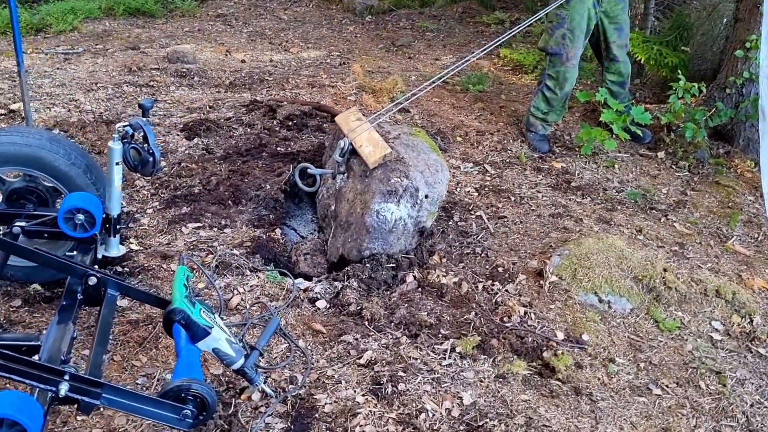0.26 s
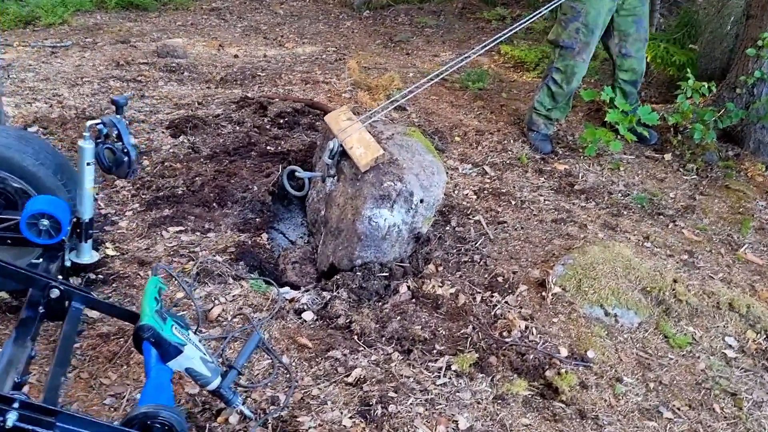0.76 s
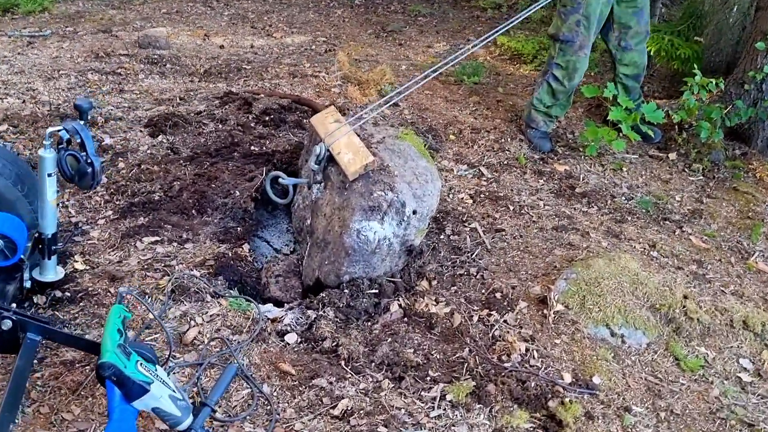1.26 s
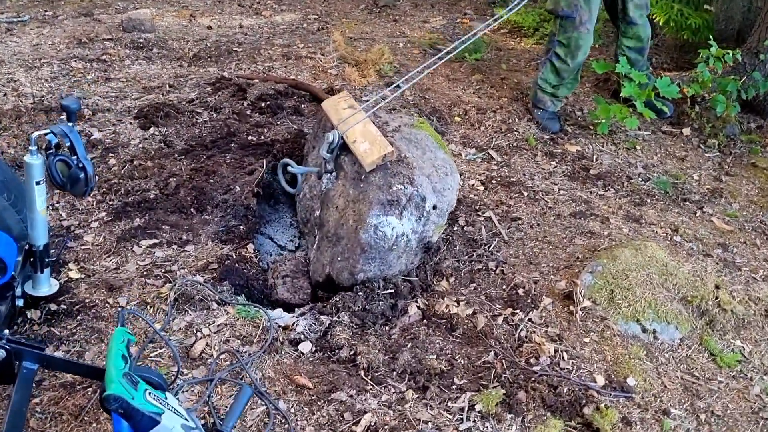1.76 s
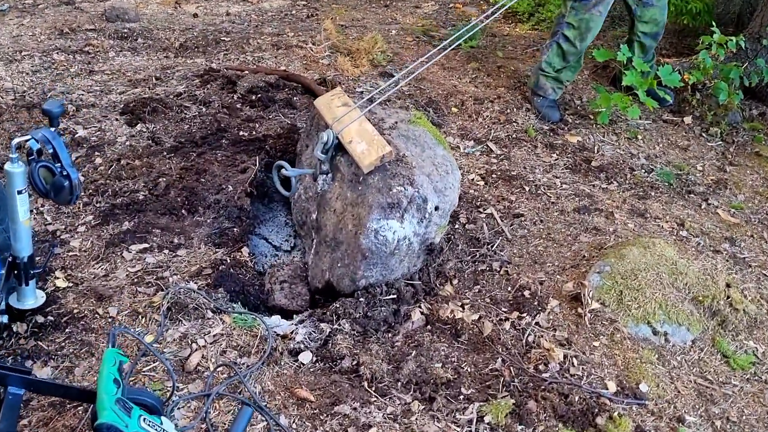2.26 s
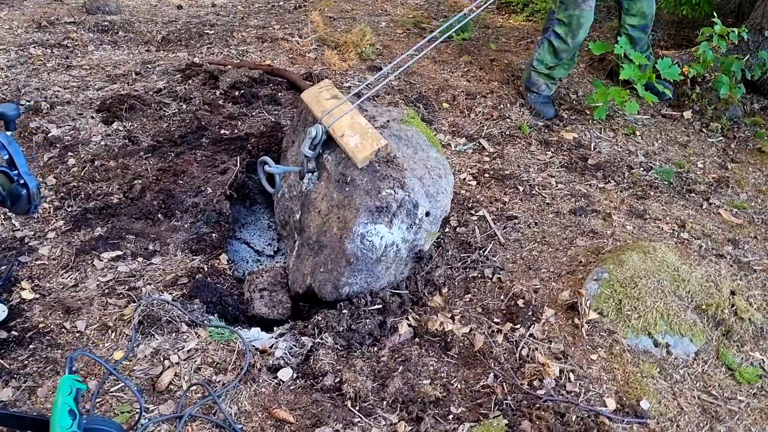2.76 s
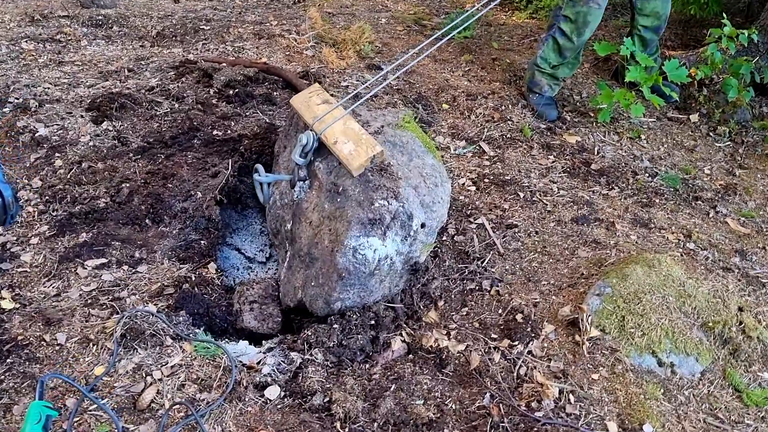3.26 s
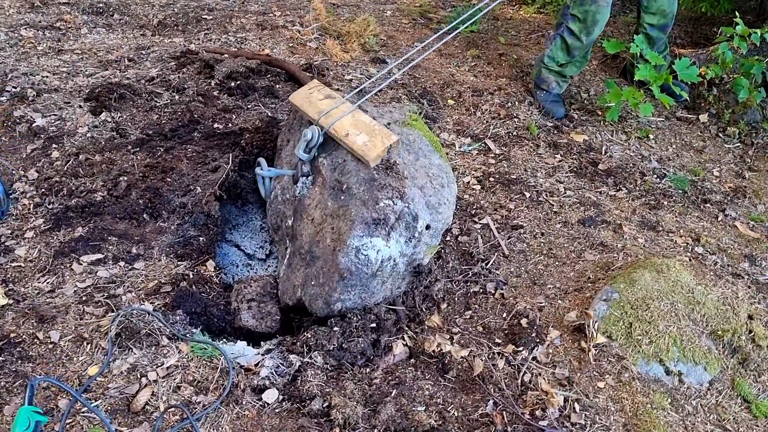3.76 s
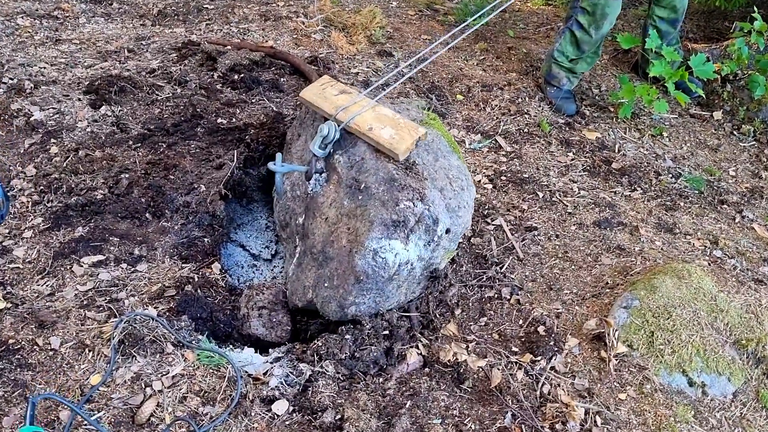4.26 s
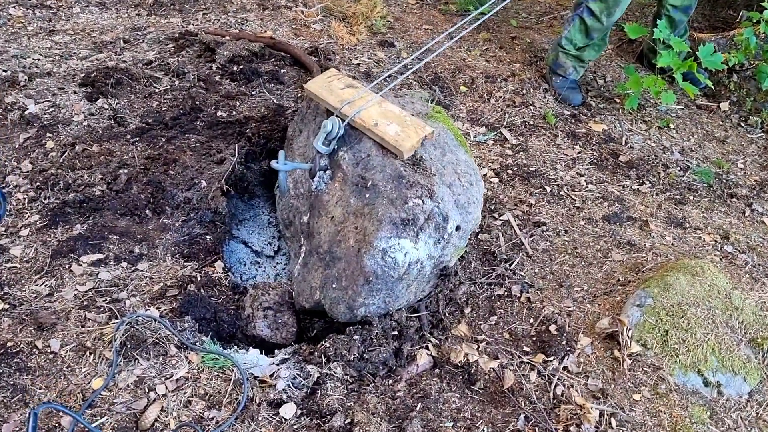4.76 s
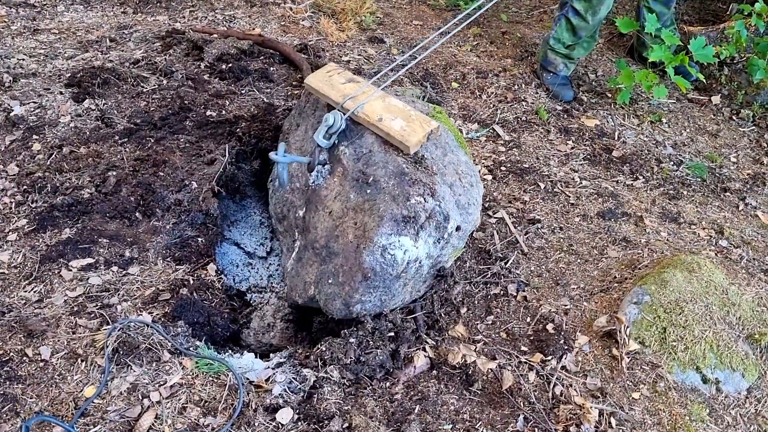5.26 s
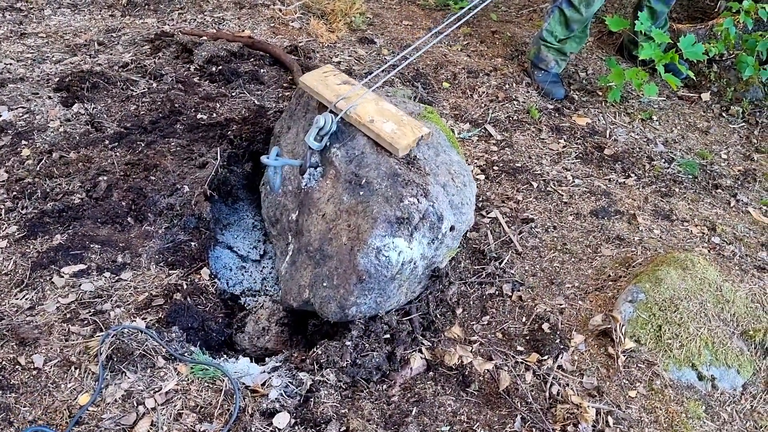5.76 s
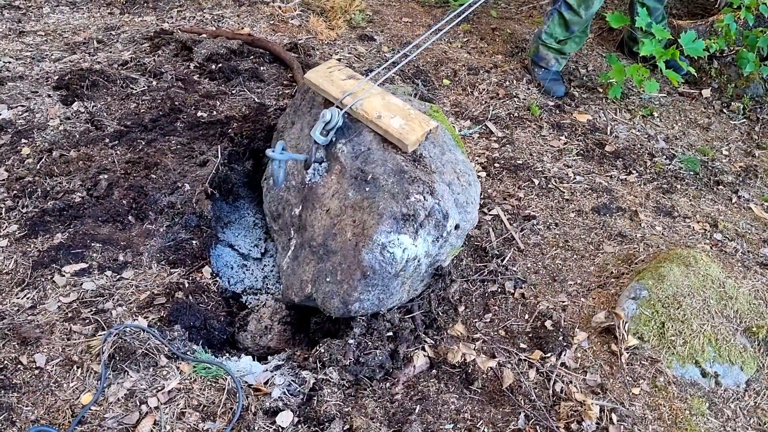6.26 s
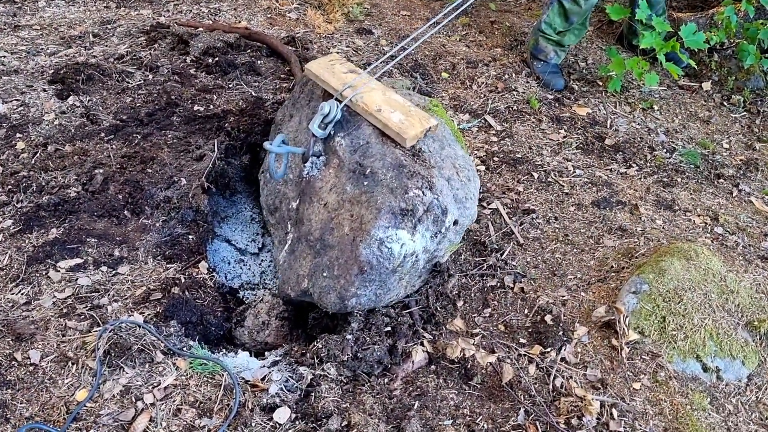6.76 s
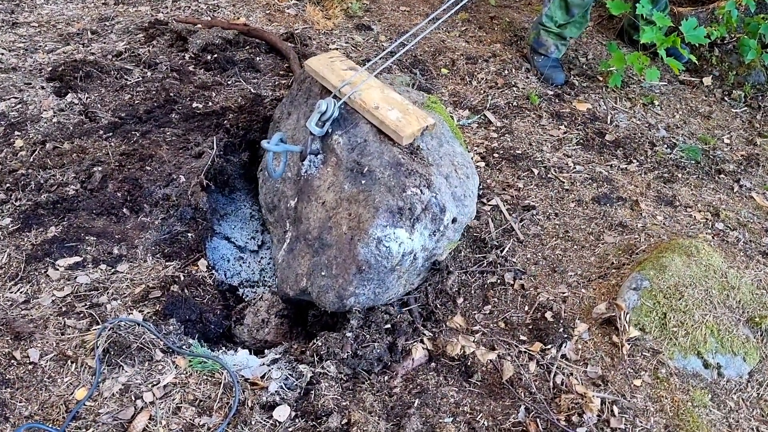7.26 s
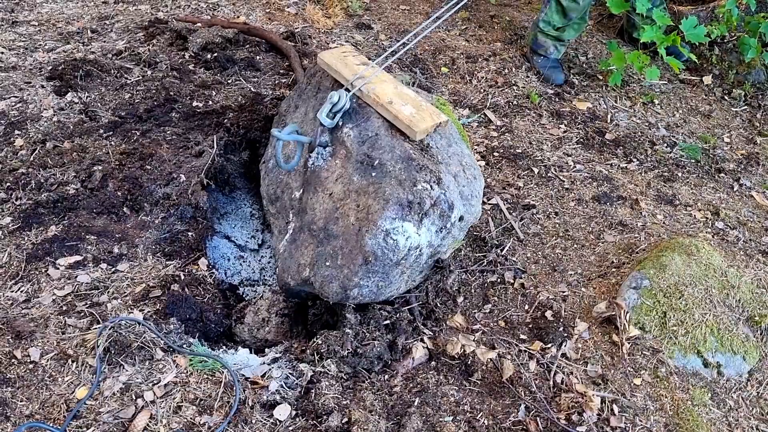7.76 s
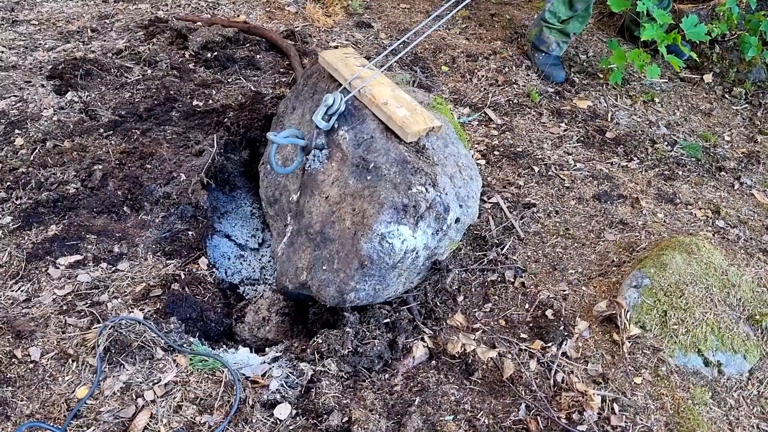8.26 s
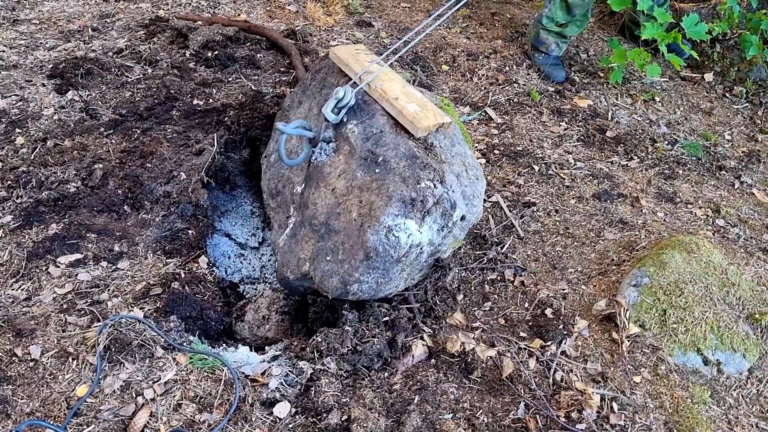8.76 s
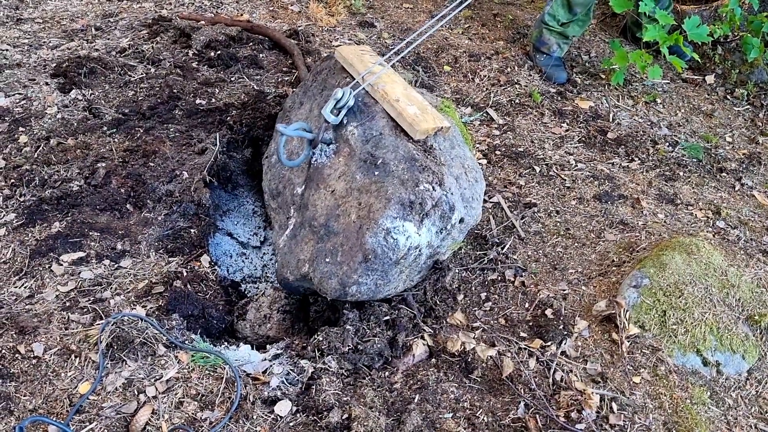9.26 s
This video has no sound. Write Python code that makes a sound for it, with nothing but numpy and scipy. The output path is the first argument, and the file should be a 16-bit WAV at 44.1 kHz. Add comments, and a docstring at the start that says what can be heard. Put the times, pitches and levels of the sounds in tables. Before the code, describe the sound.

A hand cable winch, slightly to the right, ratchets steadily in sharp groups of three clicks, its steel frame knocking and rattling between strokes. In front, a boulder groans briefly and thuds in the soil while twigs crack. The taut cable squeaks once near the middle, followed by the heaviest thud; later a steel hook rings briefly. Faint birds whistle far off over a soft forest hiss, heard in stereo.

```python
"""Sharp ratchet clicks in threes, off to the right: a hand cable winch drags a boulder out of its hole.
Each push and pull of the lever lets one of two steel pawls snap over three teeth; between strokes the
frame knocks under load and the cable squeaks once. In front of the microphone pair the boulder groans
and thuds in the soil and twigs crack. Far birds whistle over the hiss of the forest all round."""
import sys
import numpy as np
from scipy import signal
from scipy.fft import rfft, irfft
from scipy.io import wavfile
from scipy.ndimage import uniform_filter1d

SR = 44100
rng = np.random.default_rng(int(sys.argv[2]) if len(sys.argv) > 2 else 0)


def log_audio(samples):
    """Write samples as a 16-bit WAV file to the path given in sys.argv[1]."""
    # one column per channel
    frames = np.atleast_2d(samples).T
    # limit to full scale, then quantise
    limited = np.clip(frames, -1, 1)
    pcm = np.round(limited * 32767).astype(np.int16)
    wavfile.write(sys.argv[1], SR, pcm)


N = 418943

# Lever strokes. Each row: three snap times in seconds, then ring and clack in relative dB.
PUSH_STROKES = [(0.8839, 0.9541, 1.033, -13.5, -25.5), (2.092, 2.1622, 2.2318, -12.5, -24),
                (3.2596, 3.3362, 3.4092, -11.5, -24), (4.5175, 4.59, 4.6788, -14, -24.5),
                (5.718, 5.7888, 5.8866, -15.5, -26), (6.9505, 7.018, 7.103, -15, -25),
                (8.128, 8.206, 8.2803, -14, -25.5), (9.341, 9.4238, 9.505, -16, -25)]
PULL_STROKES = [(0.0686, 0.15, 0.2335, -11.5, -30.5), (1.3865, 1.475, 1.5526, -12, -30.5),
                (2.591, 2.675, 2.7387, -13, -29.5), (3.784, 3.8678, 3.937, -14, -29),
                (4.9701, 5.0468, 5.12, -15.5, -31), (6.1582, 6.2382, 6.315, -15.5, -30.5),
                (7.441, 7.5194, 7.5936, -16, -29.5), (8.632, 8.708, 8.771, -14.5, -29.5)]
# The pull pawl bounces on a tooth. Each row: start in seconds, ring and clack in relative dB.
PAWL_BOUNCES = [(3.8905, -23, -34.5), (5.2011, -29, -41)]
# Resonances of pawls, housing and frame. Each row: pitch in Hz, nominal width in Hz, gain in dB.
PUSH_PAWL_MODES = [(13530, 1130, -1.5), (15500, 810, -27)]
PULL_PAWL_MODES = [(11820, 200, -22.5), (12540, 740, -4.5), (14900, 890, -27)]
PUSH_HOUSING_MODES = [(1690, 230, -9.5), (2280, 230, -13), (2780, 56, -6.5), (3480, 170, -11),
                      (4166, 103, -2.5), (5190, 340, -3.5), (5660, 140, -8.5), (6050, 140, -17),
                      (6600, 120, -1)]
PULL_HOUSING_MODES = [(1570, 480, -6.5), (2290, 150, -7), (2655, 62, -3.5), (3040, 62, -4),
                      (3930, 30, -8.5), (5330, 53, -2.5), (5600, 35, -15), (7000, 470, -1)]
FRAME_RESONANCES = [(544, 52, -14.5), (1552, 81, -7.5), (1842, 72, -8), (2213, 45, -12.5), (2890, 35, -10),
                    (3380, 63, -9)]
# Knocks of the frame. Each row: start in seconds, body and rattle in relative dB.
FRAME_KNOCKS = [(0.805, -32, -45.5), (1.268, -26.5, -33), (2.005, -35, -46), (2.466, -32, -37),
                (2.619, -43, -49), (3.154, -32, -43), (3.488, -42, -46), (3.665, -31.5, -33),
                (3.893, -42, -37), (3.936, -36, -47), (3.966, -34.5, -45), (4.427, -33, -38.5),
                (4.834, -37, -42), (5.09, -36.5, -58), (5.106, -30.5, -51), (5.502, -42, -52.5),
                (5.627, -38, -49), (6.033, -34, -39), (6.236, -26.5, -37), (6.3, -36, -42),
                (6.464, -43, -41.5), (6.768, -43, -50), (6.867, -27, -32.5), (7.293, -29, -33),
                (7.548, -33.5, -59), (7.595, -29.5, -38), (7.605, -24.5, -37), (7.681, -32, -49),
                (7.723, -56, -43), (7.945, -32.5, -44.5), (8.04, -29.5, -43), (8.349, -48.5, -57),
                (8.508, -27, -34), (8.701, -32, -42), (8.754, -33.5, -46), (8.799, -37.5, -37),
                (8.9, -48.5, -47.5), (9.139, -39, -46), (9.245, -30, -42.5)]
# The frame's main ring sinks as cable winds on and is strongest while the boulder tips out.
# Each row: time in seconds, pitch in Hz, gain in dB.
FRAME_RING_CURVE = [(1.2, 1143, -9), (3.1, 1140, -15.5), (5, 1095, -5), (6.3, 1068, -5.5),
                    (7.5, 1027, -9.5), (9.3, 1040, -12.5)]
# A hard blow on the hook. Each row: start in seconds, level in dB.
HOOK_BLOWS = [(7.61, -38.5)]
# Modes of the hook. Each row: pitch in Hz, gain in dB, t60 in seconds.
HOOK_MODES = [(980, -9, 0.091), (1920, -2, 0.07), (2200, -13, .07), (2830, 6.5, 0.22), (3666, -14, .086),
              (4021, -20, 0.43), (7940, -3.5, 0.42)]
# Cable creaks on the drum. Each row: start and length in seconds, level in dB.
DRUM_CREAKS = [(3.857, 0.23, -58.5), (4.957, 0.33, -56), (6.212, 0.17, -53), (7.382, 0.29, -60),
               (8.66, 0.22, -60.5), (9.119, 0.14, -63.5)]
# Cable slips over steel. Each row: peak time in seconds, level in dB, pitch in Hz.
CABLE_SLIPS = [(4.342, -39, 5880), (4.398, -31.5, 5660), (4.418, -24, 5710)]
# Thuds in the soil. Each row: start in seconds, level in dB, pitch in Hz, t60 in seconds.
BOULDER_THUDS = [(0.144, -29.5, 156.3, 0.24), (1.500, -42, 55, 0.13), (3.847, -40, 103.5, 0.34),
                 (3.999, -42, 224, 0.054), (5.217, -23, 504, 0.019), (5.2213, -29, 308, 0.044),
                 (5.222, -17, 121, 0.06), (5.239, -27, 550, 0.011), (5.253, -30.5, 79, 0.058),
                 (5.279, -35.5, 129, 0.053), (6.874, -36.5, 293, 0.037), (6.884, -36, 147, 0.033)]
# Lurches that die away in a groan. Each row: start in seconds, level in dB, t60 in seconds.
BOULDER_LURCHES = [(0.0, -42.5, 0.75), (0.123, -34, 0.52), (0.3, -43, 0.41)]
# Soil slides under the boulder. Each row: peak time and length in seconds, level in dB.
SOIL_SLIDES = [(0.257, 0.65, -57.5), (1.53, 0.18, -52.5), (2.805, 0.5, -62), (3.94, 0.36, -49.5),
               (5.106, 0.21, -48.5), (5.269, 0.16, -43)]
# Wood and grit crack under the load. Each row: start in seconds, level in dB, centre in Hz.
TWIG_CRACKS = [(0.104, -37, 1830), (0.369, -47, 3120), (0.527, -53, 885), (0.574, -52, 1070),
               (0.691, -42, 920), (0.705, -44, 725), (0.712, -40.5, 1780), (1.676, -47, 2980),
               (2.724, -28.5, 1890), (2.885, -53, 3800), (3.028, -46, 450), (4.345, -47, 3300),
               (8.004, -50, 4860), (9.193, -52.5, 8800)]
# Far birds. Each row: start and length in seconds, first and last pitch in Hz, relative level in dB.
BIRD_CALLS = [(1.808, 0.1, 4450, 4700, -51.5), (1.96, 0.088, 4180, 4160, -52.5),
              (2.18, .09, 4800, 4850, -58), (2.463, 0.085, 7550, 7800, -60), (2.85, 0.082, 7800, 7050, -61),
              (3.045, 0.23, 4700, 4520, -61), (3.451, 0.14, 4060, 3980, -59.5),
              (7.771, 0.077, 2316, 2180, -66), (8.9, 0.047, 3600, 3700, -59), (9, 0.039, 3610, 3545, -56)]
# The breeze dies down. Each row: time in seconds, level in dB.
BREEZE_CURVE = [(0, -53), (1.2, -55), (3.5, -55.5), (5.4, -59.5), (9.5, -59.5)]
# Tone colours of the noises. Each row: frequency in Hz, relative level in dB.
PUSH_CLACK_SPECTRUM = [(300, -25), (800, -37.5), (1500, -7), (1900, -7.5), (2750, 3.5), (3600, 4),
                       (4600, -0.5), (5600, 2.5), (7700, 3), (8900, -8), (11500, -8.5), (15400, 7.5),
                       (16200, -24)]
PULL_CLACK_SPECTRUM = [(300, -31.5), (900, -23.5), (1500, -2.5), (1900, -4.5), (2500, 2), (3300, 0.5),
                       (3800, 3), (4700, -5.5), (5500, 1), (7100, -1), (8400, -8.5), (11000, -8.5),
                       (15400, -3), (16200, -21)]
KNOCK_SPECTRUM = [(200, -17), (400, -15), (550, -13.5), (750, -4.5), (1050, -7.5), (1280, 4), (1550, 2),
                  (1700, 5), (1880, -1), (2400, 4), (3000, 6.5), (5000, -35.5)]
RATTLE_SPECTRUM = [(1200, -28), (2200, -12.5), (2800, -0.5), (3900, 2), (4600, -4), (6800, -6.5),
                   (8500, -19), (13000, -18.5), (16000, -24)]
SOIL_SPECTRUM = [(20, -36.5), (30, -13.5), (45, -4.5), (70, 9), (100, 0.5), (140, -3), (220, -11),
                 (350, -14), (700, -58.5)]
HISS_SPECTRUM = [(120, -25.5), (200, 2), (259, -7), (763, -7.5), (916, -10), (1100, -8), (1530, -13.5),
                 (2210, -13.5), (2380, -14), (3760, -10.5), (5330, -12), (7680, -16), (9060, -26),
                 (13300, -20.5), (16000, -25)]
RUB_SPECTRUM = [(400, -15.5), (1100, -5.5), (2000, -3), (3800, 3.5), (7000, -6), (9000, -12.5),
                (15000, -14)]
GROAN_SPECTRUM = [(40, -36), (100, -11), (150, 6), (200, -.5), (260, -1), (330, -21), (400, -17),
                  (700, -24), (2000, -46)]
GRIT_SPECTRUM = [(150, -2.5), (600, 2.5), (2000, -5), (6000, -14), (15000, -17.5)]
LEAF_SPECTRUM = [(800, -19), (2500, 2.5), (4500, 4), (7500, -2), (9000, -13.5), (15000, -11.5)]
# The winch arrives late at the left microphone. Each row: frequency in Hz, delay in milliseconds.
LEFT_MIC_DELAY = [(500, 0.095), (1000, 0.22), (1400, 0.26), (2500, 0.18), (6500, 0.2), (10000, 0.2),
                  (12500, 0.201), (14000, 0.1836)]
# Decay among the trunks. Each row: frequency in Hz, t60 in seconds.
FOREST_DECAY = [(200, 0.5), (1200, 0.19), (2800, 0.31), (6000, 0.24), (9000, 0.27), (14000, 0.24)]


def pawl(strokes, bounces, clack_spectrum, ring_modes, housing_modes, ring_db, clack_db, housing_db,
         rise_s, clack_t60, ring_t60, ring_step_db, clack_step_db, crack_db,
         scrape_db=-20, scrape_s=.0045, crack_s=.0015):
    """A pawl scrapes off one tooth and cracks onto the next, ringing high while the housing clacks."""
    ring, clack, housing = np.zeros((3, 2, N))
    snaps = [(s, snap_db + tooth * ring_step_db, body_db + tooth * clack_step_db)
             for *times, snap_db, body_db in strokes for tooth, s in enumerate(times)]
    for s, snap_db, body_db in snaps + list(bounces):
        add(ring, s - scrape_s, amp(snap_db + ring_db + scrape_db) * chatter(.0024, .012, .5, 2))
        add(clack, s - scrape_s, amp(body_db + scrape_db) * chatter(.0042, .014, .71, 2.1))
        add(ring, s, amp(snap_db + ring_db) * chatter(rise_s, ring_t60, .6, 1.3))
        add(ring, s + crack_s, amp(snap_db + ring_db + crack_db) * chatter(.0003, .006, .5, 1))
        blow = amp(body_db) * chatter(rise_s, clack_t60, .68, 3.4)
        add(clack, s, blow)
        add(housing, s, amp(housing_db) * ring_out(blow, housing_modes, spread_db=2.5, detune=.019))
    ring = sum(amp(db) * band(ring, hz, width) for hz, width, db in ring_modes)
    body = amp(clack_db) * colour(clack, clack_spectrum) + housing
    return ring * mic_gains(-5, 3.5) + body * mic_gains(-2.1, 2.1)


def frame(body_db=-6, modes_db=-11.5, rattle_db=-1, ring_width_hz=130, lead_s=.002, detune=.0091):
    """The load shifts from pawl to pawl: the frame knocks, rings and rattles."""
    body, ring, rattle = np.zeros((3, 2, N))
    for s, db, loose_db in FRAME_KNOCKS:
        start = s - lead_s
        ring_hz, ring_db = frame_ring(s)
        hz = ring_hz * (1 + detune * rng.standard_normal())
        blow = amp(db) * chatter(.0045, .03, .74, 3.6)
        add(body, start, amp(body_db) * blow)
        add(ring, start, amp(modes_db) * ring_out(blow, FRAME_RESONANCES, spread_db=1, detune=.017))
        add(ring, start, amp(db + ring_db) * band(chatter(.0013, .044, .87, 2.6), hz, ring_width_hz))
        add(rattle, start, amp(loose_db + rattle_db) * chatter(.0031, .062, .27, 2.6))
    knocks = colour(body, KNOCK_SPECTRUM) + ring
    return knocks * mic_gains(-.9, .9) + colour(rattle, RATTLE_SPECTRUM) * mic_gains(-1.8, 1.8)


def frame_ring(s):
    """Pitch in Hz and gain in dB of the frame's main ring at time s."""
    times, hz, db = np.transpose(FRAME_RING_CURVE)
    return np.interp(s, times, hz), np.interp(s, times, db)


def hook():
    """The steel hook rings on after a hard blow."""
    out, t = np.zeros((2, N)), np.arange(SR) / SR
    for s, blow_db in HOOK_BLOWS:
        for hz, db, t60 in HOOK_MODES:
            add(out, s, amp(blow_db + db - 60 * t / t60) * np.sin(2 * np.pi * hz * t))
    return out


def creaks(width_hz=70):
    """Turns of cable rub on the drum and keep the frame ringing."""
    out = np.zeros((2, N))
    for s, length, db in DRUM_CREAKS:
        size = int(length * SR)
        ring_hz, _ = frame_ring(s)
        ring = unit_rms(band(noise_pair(.51, size), ring_hz, width_hz))
        add(out, s, amp(db) * ring * signal.windows.tukey(size, .5))
    return out


def lever(rub_db=-59, lead_s=.05, trail_s=.09):
    """The lever rubs on its pivot through every stroke."""
    rub = np.zeros((2, N))
    for first, _, last, *_ in PUSH_STROKES + PULL_STROKES:
        size = int((lead_s + last - first + trail_s) * SR)
        add(rub, first - lead_s, amp(rub_db) * signal.windows.tukey(size, .5) * noise_pair(.75, size))
    return colour(rub, RUB_SPECTRUM)


def squeak(octave_db=-25, waver=.011, swell_s=.0073, ring_db=-19, ring_t60=.17, lead_s=.026):
    """The taut cable slips over steel: each slip swells into a thin tone, then rings on faintly."""
    out, t = np.zeros(N), np.arange(SR // 4) / SR - lead_s
    for s, db, hz in CABLE_SLIPS:
        phase = 2 * np.pi * np.cumsum(hz * (1 + waver * drift(340)[:len(t)])) / SR
        tone = np.sin(phase) + amp(octave_db) * np.sin(2 * phase)
        swell = np.exp(-(t / swell_s) ** 2)
        tail = amp(ring_db - 60 * abs(t) / ring_t60) * np.clip(1 + t / (3 * swell_s), 0, 1)
        add(out, s - lead_s, amp(db) * (swell + tail) * tone)
    return out * mic_gains(-1.5, 1.5)


def boulder(slips_hz=99, lurch_rise_s=.0087, rest_db=-60):
    """Straight ahead: damped thuds, a stick-slip groan after each lurch, a rumble of sliding soil."""
    thuds, t = np.zeros((2, N)), np.arange(SR) / SR
    for s, db, hz, t60 in BOULDER_THUDS:
        swing = (1 - np.exp(-(t * hz * 2) ** 2)) * amp(-60 * t / t60)
        add(thuds, s, amp(db) * swing / swing.max() * np.sin(2 * np.pi * hz * t))
    drag, sliding = np.zeros((2, N))
    for s, db, t60 in BOULDER_LURCHES:
        add(drag, s, np.minimum(t / lurch_rise_s, 1) * amp(db - 60 * t / t60))
    for s, length, db in SOIL_SLIDES:
        add(sliding, s - length / 2, amp(db) * signal.windows.cosine(int(length * SR)))
    slip_count = np.floor(np.cumsum(slips_hz * (1 + .1225 * drift(42))) / SR)
    slips = np.diff(slip_count, prepend=0) * amp(3.5 * drift(51))
    groan = unit_rms(colour(slips[None], GROAN_SPECTRUM))
    rumble = unit_rms(colour(noise_pair(.92, N), SOIL_SPECTRUM)) * amp(drift(12))
    return thuds + groan * drag + rumble * np.hypot(amp(rest_db), sliding)


def litter(crumbs_db=-11, crumbs_per_s=60, crunch_db=-58, crunch_per_s=260, drag_at_s=.02, drag_s=.76):
    """Twigs crack, crumbs of soil trickle onto dry leaves, grit crunches under the dragged boulder."""
    out = np.zeros((2, N))
    for s, db, hz in TWIG_CRACKS:
        add(out, s, amp(db) * band(chatter(.00053, .034, .42, 1), hz, width=hz))
    crumbs_gain = amp(crumbs_db + curve(BREEZE_CURVE))
    crunch_gain = np.zeros(N)
    add(crunch_gain, drag_at_s, amp(crunch_db) * signal.windows.tukey(int(drag_s * SR), .3))
    for per_s, gain in (crumbs_per_s, crumbs_gain), (crunch_per_s, crunch_gain):
        hits = (rng.random(N) < per_s / SR) * amp(2.8 * np.minimum(rng.exponential(1, N), 3))
        grains = signal.oaconvolve(hits[None], chatter(.0001, .011, .12, 2.5), axes=1)[:, :N]
        out += gain * unit_rms(colour(grains, GRIT_SPECTRUM))
    return out


def birds(level_db=-2, warble=.17):
    """Far off, birds give soft gliding whistles with a fine warble."""
    out = np.zeros((2, N))
    for s, length, start_hz, end_hz, db in BIRD_CALLS:
        size = int(length * SR)
        flutter = uniform_filter1d(rng.standard_normal(size), 150)
        hz = np.linspace(start_hz, end_hz, size) * (1 + warble * flutter)
        whistle = np.sin(2 * np.pi * np.cumsum(hz) / SR)
        add(out, s, amp(db + level_db) * signal.windows.tukey(size, .6) * whistle)
    return out


def trees(leaves_db=-7, leaves_swell=1.04):
    """All round the microphones, trees hiss and leaves rustle with the breeze."""
    breeze_db = curve(BREEZE_CURVE) + .5 * drift(18)
    hiss = unit_rms(colour(noise_pair(.078, N), HISS_SPECTRUM)) * amp(breeze_db)
    leaves = unit_rms(colour(noise_pair(.035, N), LEAF_SPECTRUM))
    leaves *= amp(leaves_db + breeze_db.mean() + leaves_swell * (breeze_db - breeze_db.mean()))
    return (hiss + leaves) * mic_gains(-.6, .6)


def forest_echoes(x, build_s=.0027, paths=3):
    """Trunks and ground scatter echoes; the paths change as the winch swings."""
    out = np.zeros((2, N))
    for k in range(paths):
        reflections = rng.standard_normal((2, SR)) * (rng.random((2, SR)) < .15)
        hz, t, bins = signal.stft(reflections, SR, nperseg=256)
        bins *= amp(-60 * t / at_hz(FOREST_DECAY, hz)[:, None]) * (1 - np.exp(-(t / build_s) ** 2))
        tail = signal.istft(bins, SR, nperseg=256)[1]
        share = np.cos(np.pi * (np.arange(N) / SR + k / paths)) * np.sqrt(2 / paths)
        out += signal.oaconvolve(x * share, tail / np.linalg.norm(tail[0]), axes=1)[:, :N]
    return out


def from_right(x):
    """Sound from the right reaches the left microphone later."""
    hz = np.fft.rfftfreq(N, 1 / SR)
    delay_s = at_hz(LEFT_MIC_DELAY, hz) / 1000
    left = irfft(rfft(x[0]) * np.exp(-2j * np.pi * hz * delay_s), N)
    return np.array([left, x[1]])


def chatter(rise_s, t60, shared, grain_db, size=4096):
    """A blow: a quick run of ever weaker contacts and ground reflections."""
    t = np.arange(size) / SR
    contacts = amp(grain_db * np.repeat(rng.standard_normal(size // 16), 16))
    envelope = (1 - np.exp(-(t / rise_s) ** 2)) * amp(-60 * t / t60)
    burst = noise_pair(shared, size) * contacts * envelope
    return burst / np.linalg.norm(burst[0]) * np.sqrt(SR / 100)  # the energy of 10 ms at rms 1


def ring_out(blow, modes, spread_db, detune):
    """Resonances excited by one blow; no two blows land on quite the same spot."""
    chance = rng.standard_normal((len(modes), 2))
    return sum(amp(db + spread_db * strength) * band(blow, hz * (1 + detune * shift), 2 * width)
               for (hz, width, db), (strength, shift) in zip(modes, chance))


def band(x, hz, width):
    """A resonance applied twice, for steep skirts; keeps the power of white noise."""
    radius = np.exp(-np.pi * width / SR)
    pole = radius * np.exp(2j * np.pi * hz / SR)
    gain = np.sqrt(2 * (1 - radius ** 2) ** 3 / (1 + radius ** 2))
    return gain * signal.lfilter([1], [1, -2 * pole, pole * pole], x).real


def colour(x, spectrum, size=4096):
    """Causal filter of unit energy with the given spectrum."""
    log_gain = np.log(amp(at_hz(spectrum, abs(np.fft.fftfreq(size, 1 / SR)))))
    taps = np.fft.ifft(np.exp(signal.hilbert(log_gain).conj())).real[:size // 2]
    return signal.oaconvolve(x, taps[None] / np.linalg.norm(taps), axes=1)[:, :x.shape[1]]


def noise_pair(shared, size):
    """White noise at two microphones, with correlation `shared`."""
    left, other = rng.standard_normal((2, size))
    return np.array([left, shared * left + np.sqrt(1 - shared ** 2) * other])


def drift(rate_hz):
    """Random wander of rms 1."""
    hz = np.fft.rfftfreq(N, 1 / SR)
    return unit_rms(irfft(rfft(rng.standard_normal(N)) * np.exp(-(hz / rate_hz) ** 2), N))


def mic_gains(left_db, right_db):
    """Gains at the left and right microphones."""
    return amp([[left_db], [right_db]])


def amp(db):
    """Decibels to gain."""
    return 10 ** (np.asarray(db) / 20)


def unit_rms(x):
    """Scales to rms 1."""
    return x / np.sqrt(np.mean(x ** 2) + 1e-20)


def at_hz(rows, hz):
    """Reads (Hz, value) rows on a log-frequency axis."""
    row_hz, value = np.transpose(rows)
    return np.interp(np.log(hz + 1), np.log(row_hz + 1), value)


def curve(rows):
    """Reads (seconds, value) rows at every sample."""
    return np.interp(np.arange(N) / SR, *np.transpose(rows))


def add(mix, s, sound):
    """Mixes a sound in at s seconds."""
    part = mix[..., max(round(s * SR), 0):][..., :sound.shape[-1]]
    part += sound[..., :part.shape[-1]]


def scene():
    """The winch off to the right, the boulder in front, the forest all round."""
    push = pawl(PUSH_STROKES, [], PUSH_CLACK_SPECTRUM, PUSH_PAWL_MODES, PUSH_HOUSING_MODES,
                ring_db=-7.5, clack_db=-2, housing_db=-15, rise_s=.0012, clack_t60=.037, ring_t60=.03,
                ring_step_db=-2, clack_step_db=.07, crack_db=-9.5)
    pull = pawl(PULL_STROKES, PAWL_BOUNCES, PULL_CLACK_SPECTRUM, PULL_PAWL_MODES, PULL_HOUSING_MODES,
                ring_db=-6.5, clack_db=.5, housing_db=-13.5, rise_s=.00056, clack_t60=.077,
                ring_t60=.047, ring_step_db=-.5, clack_step_db=.42, crack_db=-4)
    winch = from_right(push + pull + frame() + hook() + creaks() + lever())
    ground, song = litter(), birds()
    cable = from_right(squeak())
    winch_send = amp(-12.5) * winch * mic_gains(1, -1.2)
    echoes = forest_echoes(winch_send + amp(-10) * ground + amp(5) * song + amp(-14) * cable)
    return winch + cable + ground + song + echoes + boulder() + trees()


def record(dry):
    """The recorder cuts off the highest treble."""
    edge_hz = 16050
    lowpass = signal.firwin(201, edge_hz, window=("kaiser", 8), fs=SR)
    return signal.oaconvolve(dry, lowpass[None], "same")


dry = scene()
out = record(dry)
log_audio(out)
```